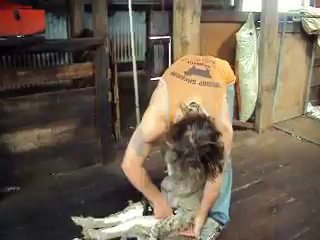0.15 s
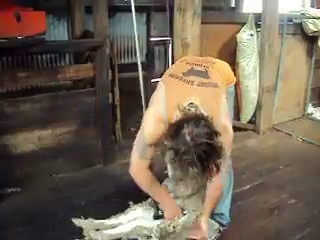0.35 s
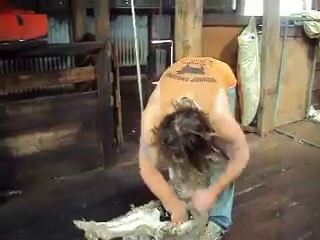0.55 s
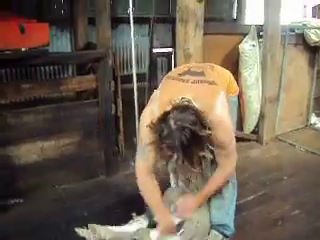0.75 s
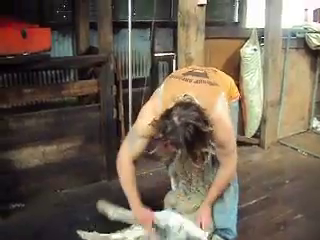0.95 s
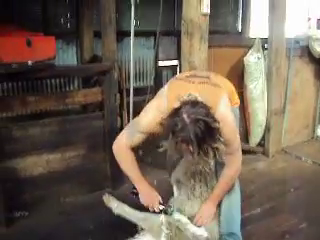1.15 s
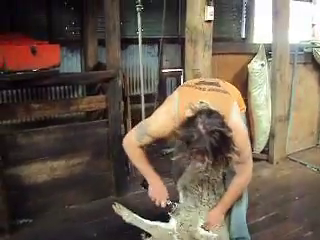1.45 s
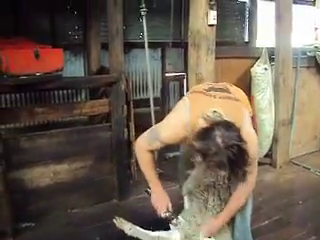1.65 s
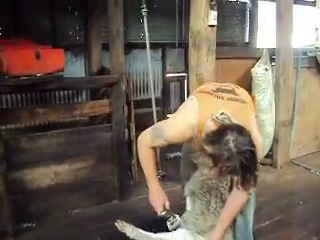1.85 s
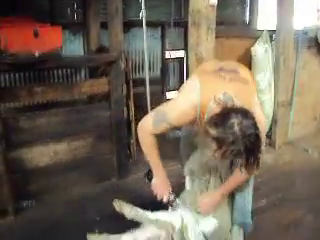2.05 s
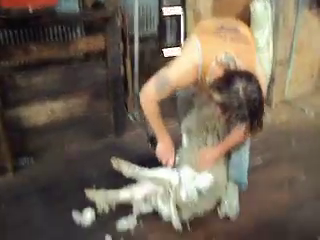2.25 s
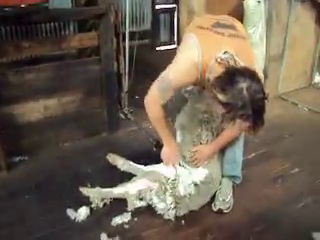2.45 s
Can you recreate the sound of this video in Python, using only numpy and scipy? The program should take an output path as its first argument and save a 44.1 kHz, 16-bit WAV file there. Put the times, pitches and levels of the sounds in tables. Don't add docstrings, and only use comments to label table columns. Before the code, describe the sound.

A motorised sheep-shearing handpiece buzzes and scrapes steadily over a low motor hum in a shed

```python
import sys
import numpy as np
from scipy import signal
from scipy.fft import rfft, irfft, next_fast_len
from scipy.io import wavfile
from scipy.ndimage import uniform_filter1d

SR = 44100
rng = np.random.default_rng(int(sys.argv[2]) if len(sys.argv) > 2 else 0)


def gain_from_db(level_db):
    decades = np.asarray(level_db, float) / 20
    return 10 ** decades


def waveform_to_disk(signal):
    frames = np.transpose(np.atleast_2d(signal))
    scaled = np.clip(frames, -1, 1) * 32767
    samples = np.round(scaled).astype(np.int16)
    wavfile.write(sys.argv[1], SR, samples)


N = 114660
T = np.arange(N) / SR
SIZE = next_fast_len(N + SR // 4)
F = np.arange(SIZE // 2 + 1) * SR / SIZE + 1e-3
SHAFT_HZ, SHAFT_WANDER = 56.25, .0012


def level(x, db):
    return x * gain_from_db(db) / np.sqrt(np.mean(x ** 2))


def walk(rate):
    hold = int(SR / rate)
    steps = np.repeat(rng.standard_normal(N // hold + 1), hold)
    slewed = uniform_filter1d(uniform_filter1d(steps, hold), hold)
    return 1.3 * slewed[:N]


def colour(x, points, flicker_db, drift_db):
    hz, db = np.array(points).T
    gain = gain_from_db(np.interp(np.log(F), np.log(hz), db, -120, -120))
    spec, out = rfft(x, SIZE) * gain, 0
    for centre in hz[0] * 2 ** np.arange(0, np.log2(hz[-1] / hz[0]) + .5, .5):
        band = np.clip(1 - 2 * abs(np.log2(F / centre)), 0, 1)
        out = out + irfft(spec * band, SIZE)[:N] * gain_from_db(drift_db * walk(2.3) + flicker_db * walk(13))
    return out


def ring(x, peaks, drift_db):
    spec, out = rfft(x, SIZE), 0
    for hz, width, db, *face in peaks:
        beam = np.exp(-.5 * ((T - face[0]) / face[1]) ** 2) if face else 1
        resonance = 1 / (1 + 1j * (F - hz ** 2 / F) / width)
        out = out + beam * gain_from_db(db + drift_db * walk(4)) * irfft(spec * resonance, SIZE)[:N]
    return out


def repeat(x, gear_share):
    turn_share, gear_turns = .12, 5
    for turns, share in ((1, turn_share), (gear_turns, gear_share)):
        x, lag = x.copy(), round(turns * SR / SHAFT_HZ)
        for i in range(lag, N, lag):
            x[i:i + lag] += share * x[i - lag:i][:N - i]
    return x


def tone(turns, db, wobble_db):
    return np.sqrt(2) * gain_from_db(db + wobble_db * walk(4.67)) * np.sin(2 * np.pi * (turns + rng.random()))


def motor():
    # frequency in Hz, level in dB.
    slot_whine = [(1163.7, -57), (1263.6, -50), (1363.7, -54.5)]
    # frequency in Hz, level in dB.
    belt_flap = [(11.6, -58), (23.2, -62), (24.7, -61), (34.8, -58), (81.1, -57), (123.2, -54),
                 (139.2, -56)]
    hum_hz, hum_db, hum_phase = 100.03, -30.5, -.54
    hum = np.sqrt(2) * gain_from_db(hum_db + .4 * walk(4.6)) * np.sin(2 * np.pi * hum_hz * T + hum_phase)
    return hum + sum(tone(hz * T, db, 0.58) for hz, db in slot_whine + belt_flap)


def frame_rumble():
    # frequency in Hz, level in dB per Hz.
    floor_colour = [(15, -21.5), (40, -10), (75, -6), (130, -2.5), (200, -0.5), (260, -4.5), (380, -9),
                    (600, -19.5)]
    # frequency in Hz, width in Hz, level in dB, and for a swell
    # its centre in seconds and its spread in seconds.
    frame_peaks = [(170, 51, -1.7), (222, 12, 4.1, .35, 0.29), (224, 14, 0), (243, 12, 0.5), (305, 30, -1),
                   (346, 11, -2.5)]
    floor = colour(repeat(rng.standard_normal(N), .22), floor_colour, flicker_db=.5, drift_db=-0.2)
    frame = ring(repeat(rng.standard_normal(N), .22), frame_peaks, drift_db=-3.0)
    return level(level(floor, 0) + level(frame, -2.5), -37.5)


def tube_rattle(strain_db):
    # frequency in Hz, level in dB per Hz.
    rattle_colour = [(300, -12.5), (430, 0.5), (550, 2.5), (900, 1.5), (1150, -5), (1450, -9),
                     (1600, -16.5), (2200, -32.5)]
    # frequency in Hz, width in Hz, level in dB.
    tube_peaks = [(486.4, 9.2, 5), (570, 24, -3), (677.5, 15, -3.5), (744, 12, 4.5), (846, 24, -0.5),
                  (918.5, 24, -1), (1076, 14, -1), (1140, 11, -0.5), (1216, 20, -4.5), (1477, 16, -8),
                  (1511, 15, -7.5)]
    knocks = colour(repeat(rng.standard_normal(N), .22), rattle_colour, flicker_db=0.0, drift_db=.5)
    tube = ring(repeat(rng.standard_normal(N), .22), tube_peaks, drift_db=-0.5)
    return level(level(knocks, 0) + level(tube, -2), 0) * gain_from_db(strain_db - 0.65)


def shaft_orders(turns, strain_db):
    order_levels = {1: -52.5, 2: -55, 3: -56, 4: -54, 5: -54, 9: -55, 10: -53.5, 11: -54, 15: -57, 17: -53,
                    18: -57, 19: -58, 22: -60, 25: -60, 27: -59, 31: -62, 37: -60, 40: -59}
    orders = sum(tone(k * turns, db, 1.2) for k, db in order_levels.items())
    return orders * gain_from_db((strain_db - strain_db.mean()) / 2)


def drive(turns):
    # time in seconds, rattle level in dB.
    arm_strain = [(0, -34.5), (.2, -38.5), (.36, -33.5), (.6, -36), (.9, -36), (1.1, -33), (1.4, -40.5),
                  (1.7, -35.5), (1.9, -36.5), (2.1, -35), (2.3, -34.5), (2.45, -36.5), (2.6, -37.5)]
    strain_db = np.interp(T, *np.array(arm_strain).T)
    return frame_rumble() + tube_rattle(strain_db) + shaft_orders(turns, strain_db)


def tooth_clicks(gate):
    clicks_per_s, spread_db = 6000, 1.5
    hit, size, sign = rng.random((3, N))
    clicks = (hit < clicks_per_s / SR) * gain_from_db(-spread_db * np.log(1 - size)) * np.sign(sign - .5)
    return level(repeat(clicks, .4) * gate, 0)


def shed_power(hand_db):
    t60_s = .45
    keep = gain_from_db(-120 / (t60_s * SR))
    power = gain_from_db(2 * hand_db)
    return signal.lfilter([1 - keep], [1, -keep], power, zi=[power[0]])[0]


def cutter(turns):
    # time in seconds, cutter level in dB.
    hand_moves = [(0, -31), (.2, -31.5), (.4, -32.5), (.65, -32), (.88, -32.5), (1.0, -34.5), (1.38, -34),
                  (1.5, -33.5), (1.72, -34.5), (1.82, -34.5), (2.0, -34), (2.3, -32.5), (2.54, -35),
                  (2.6, -34.5)]
    # frequency in Hz, level in dB per Hz.
    scrape_colour = [(900, -4.5), (1350, -4), (1650, -11), (2100, -1.5), (2850, 0), (3600, -3),
                     (4800, -7.5), (6400, -9.5)]
    # frequency in Hz, width in Hz, level in dB,
    # time of facing us in seconds, spread in seconds.
    housing_faces = [(1546, 98, 2, 0.063, 0.22), (2275, 48, 0, 0.6, .25), (2690, 130, -1, .45, .4),
                     (2870, 53, 3.5, .8, .15), (3220, 200, -2, 0.26, 0.3), (2090, 73, 0, 1.58, 0.2),
                     (2770, 120, -0.5, 1.6, 0.16), (2884, 70, -3.5, 1.8, 0.35),
                     (3270, 240, -1.5, 2.3, 0.29), (2920, 140, 3.5, 2.58, 0.047),
                     (4890, 150, -10.5, 0.4, 1.5)]
    hand_db = np.interp(T, *np.array(hand_moves).T)
    stroke_depth, turn_depth = .12, .08
    gate = 1 + stroke_depth * np.cos(4 * np.pi * turns) + turn_depth * np.cos(2 * np.pi * turns + 1)
    direct = tooth_clicks(gate) * gain_from_db(hand_db)
    power = shed_power(hand_db)
    wash = rng.standard_normal(N) * np.sqrt(power)
    scrape = colour(direct + gain_from_db(-2) * wash, scrape_colour, flicker_db=1.0, drift_db=.3)
    housing = ring(repeat(rng.standard_normal(N), .4) * gate, housing_faces, drift_db=2.2)
    body = level(scrape, 0) + level(housing, -7.5)
    return level(body, 0.28) * np.sqrt(np.mean(power))


def scene():
    turns = np.cumsum(SHAFT_HZ * (1 + SHAFT_WANDER * walk(2.5))) / SR
    mix = motor() + drive(turns) + cutter(turns)
    return mix[None]


def roll_off(x):
    return signal.sosfilt(signal.butter(12, 6340, fs=SR, output="sos"), x)


def record(dry):
    # frequency in Hz, level in dB.
    mic_rolloff = [(4900, 0.5), (5300, -2.5), (5600, -8.5), (5900, -18), (6150, -29.5), (6300, -43)]
    hz, db = np.array(mic_rolloff).T
    gain_db = np.interp(np.arange(N // 2 + 1) * SR / N, hz, db, 0, -120)
    soft = irfft(rfft(dry) * gain_from_db(gain_db), N)
    return roll_off(soft + .0056)


dry = scene()
out = record(dry)
waveform_to_disk(out)
```